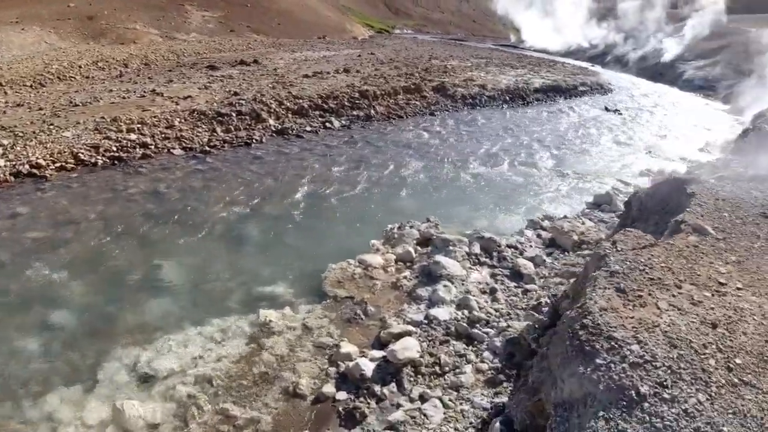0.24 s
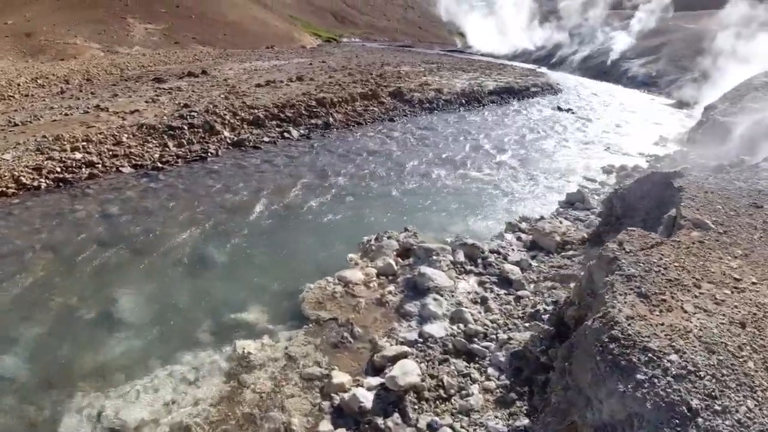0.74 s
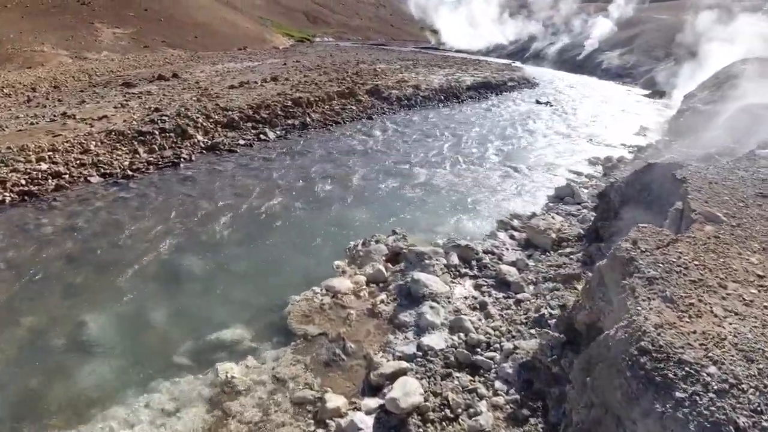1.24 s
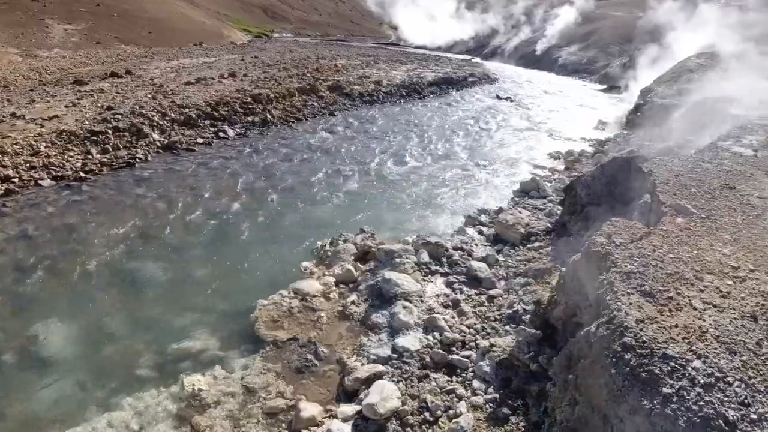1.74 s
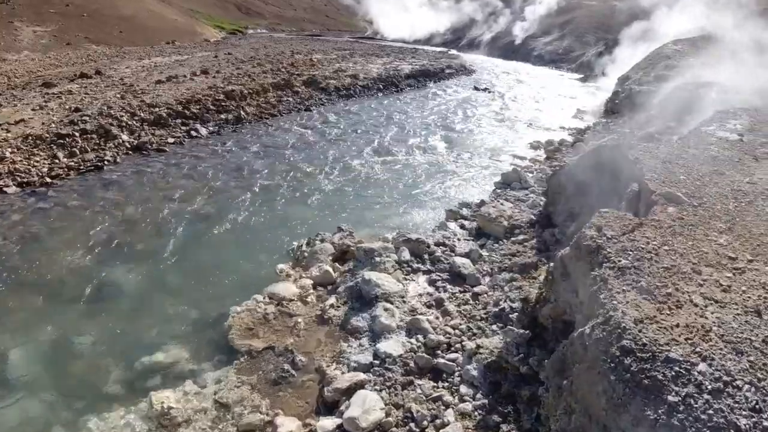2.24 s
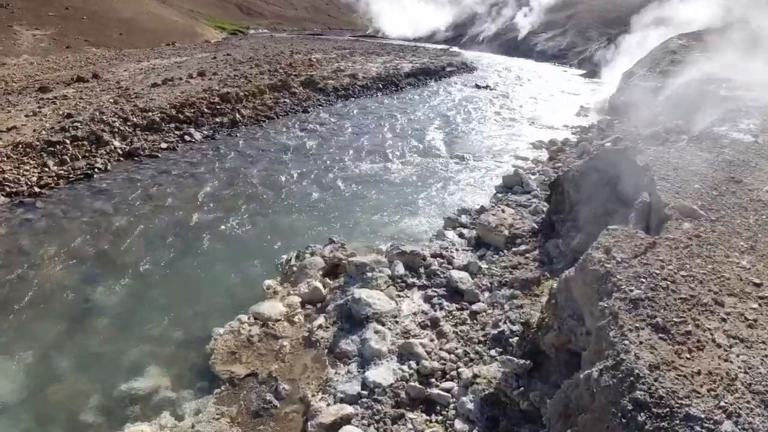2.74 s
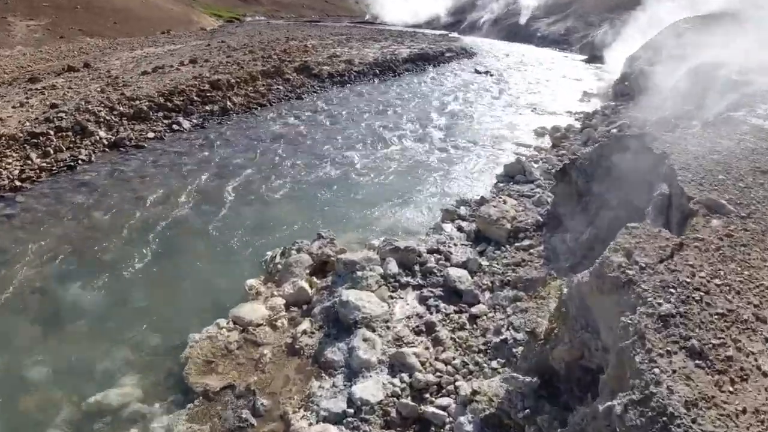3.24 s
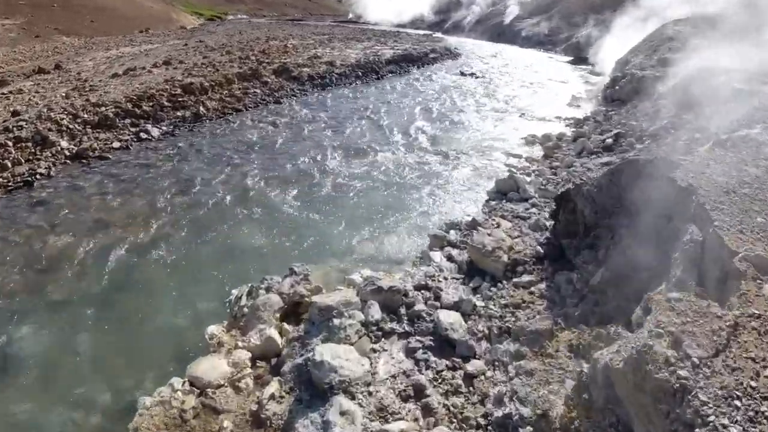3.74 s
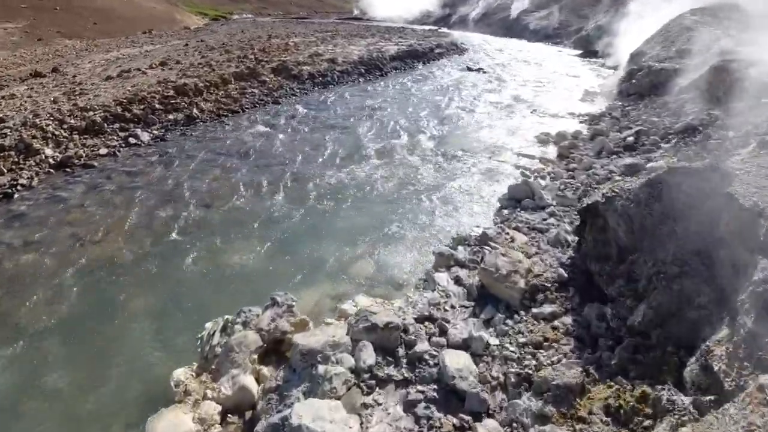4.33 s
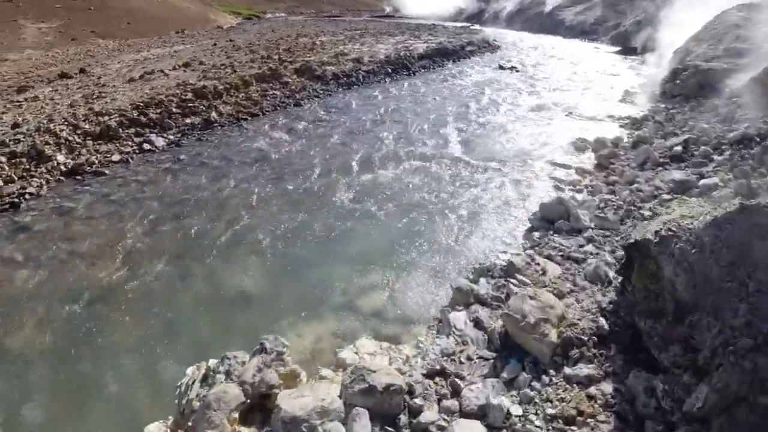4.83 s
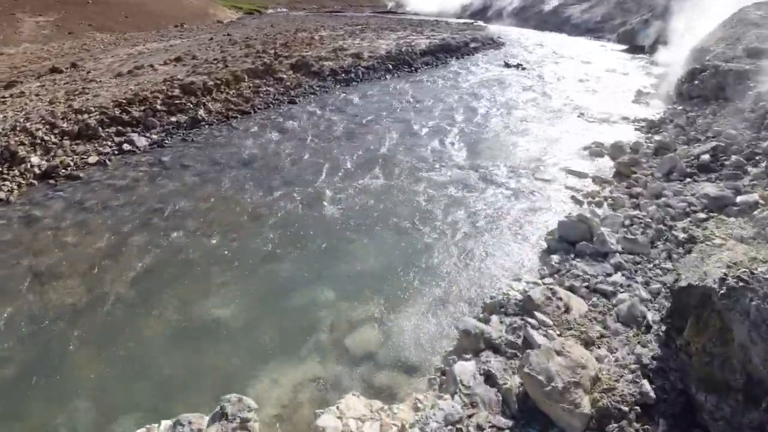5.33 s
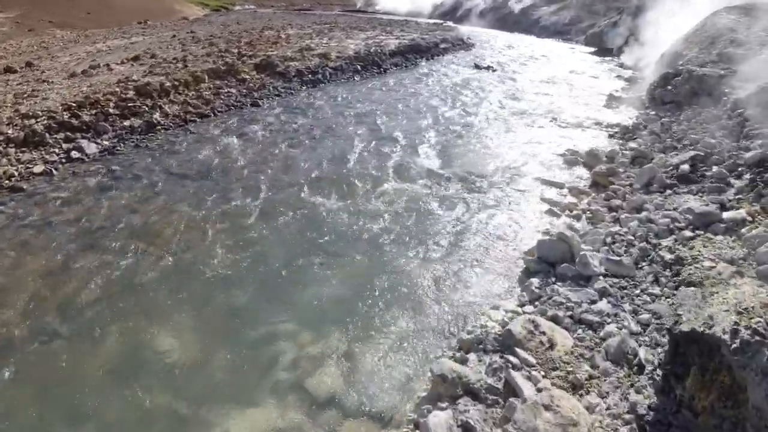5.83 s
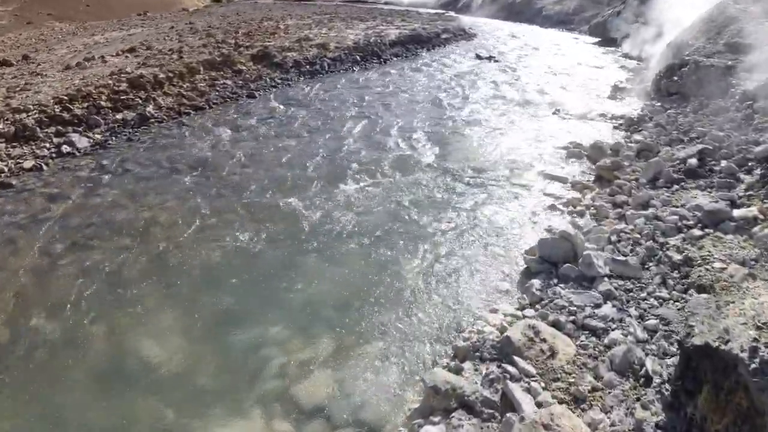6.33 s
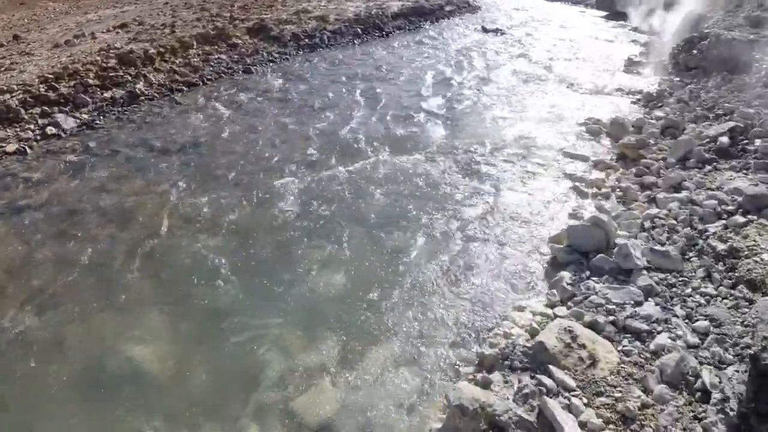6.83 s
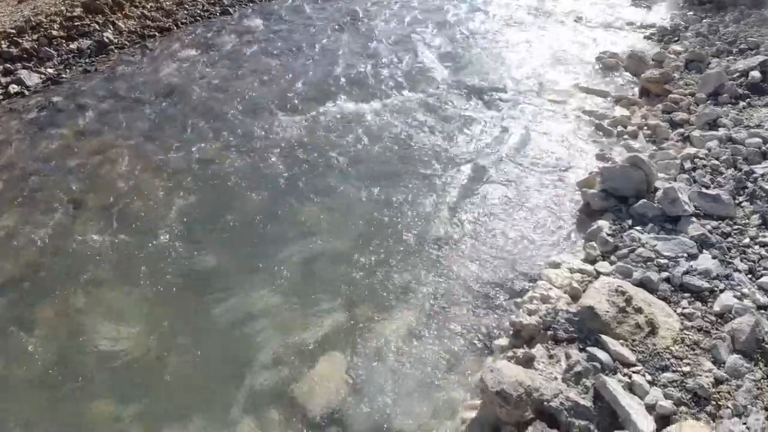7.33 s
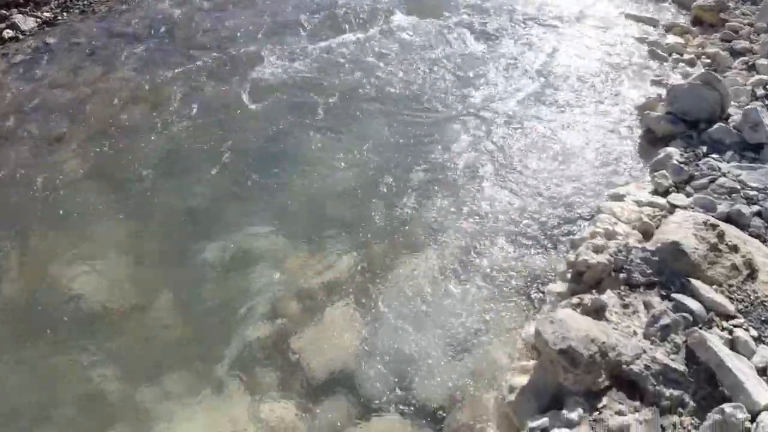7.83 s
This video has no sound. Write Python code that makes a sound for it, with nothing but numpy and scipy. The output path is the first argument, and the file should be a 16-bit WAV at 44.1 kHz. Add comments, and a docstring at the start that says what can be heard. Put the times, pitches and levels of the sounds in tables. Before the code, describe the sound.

Hot spring water boils with deep rounded glugs and plops among stones while a shallow stream babbles over gravel outdoors.

```python
"""Boiling vent beside a hot stream

Steam bubbles collapse under the stones: each swings the water, rings the hollow and shoves the ground.
Smaller bubbles glug and gargle over a low rumble; ringing bubbles and foam noise make the babbling riffle.
Single bubbles plink, water slaps, spray ticks and a pebble clicks; hissing steam and shaped noise lie behind.
A light breeze gusts early on and faintly later; a limiter ducks after the hardest peaks and recovers slowly."""
import sys
import numpy as np
from scipy import signal
from scipy.fft import rfft, irfft, next_fast_len
from scipy.io import wavfile
from scipy.ndimage import uniform_filter1d, minimum_filter1d, map_coordinates

SR = 44100
rng = np.random.default_rng(int(sys.argv[2]) if len(sys.argv) > 2 else 0)


def unload_audio(sound):
    """Save the sound as a 16-bit wav file, at the path given as the first command line argument."""
    columns = np.transpose(np.atleast_2d(sound))
    # keep every value between -1 and 1, then stretch to whole-number steps
    steps = np.round(np.clip(columns, -1, 1) * 32767)
    wavfile.write(sys.argv[1], SR, steps.astype(np.int16))


N = 355446
BLOW_S = .022  # span over which a blow's level is taken, in seconds


def amp(db):
    """Decibels to gain."""
    return 10 ** (np.asarray(db) / 20)


def unit(x):
    """Scale to rms 1."""
    return x / np.sqrt(np.mean(x ** 2) + 1e-20)


def blow(x):
    """Scale a short sound to the energy of rms 1 held for BLOW_S."""
    return x * np.sqrt(BLOW_S * SR / (np.sum(x ** 2) + 1e-20))


def fade(t, t60):
    """Exponential decay, 60 dB in t60."""
    return np.exp(-np.log(1000) * t / t60)


def along(points, hz):
    """Read a curve of (Hz, value) points on a log frequency axis."""
    f, v = np.transpose(points)
    return np.interp(np.log(hz + 1), np.log(f + 1), v)


def curves(rows):
    """One value per sample for each column after the time."""
    s, *cols = np.transpose(rows)
    return [np.interp(np.arange(N) / SR, s, c) for c in cols]


def wobble(rate):
    """A smooth random curve, rate knots a second."""
    knots = rng.standard_normal(int(N * rate / SR) + 4)
    return map_coordinates(knots, [np.arange(N) * rate / SR])


def add(track, s, sound):
    """Mix a sound into the track at time s."""
    part = track[max(round(s * SR), 0):][:len(sound)]
    part += sound[:len(part)]


def filtered(x, response):
    """Multiply the spectrum of x by a response of frequency."""
    m = next_fast_len(N + SR // 2)
    return irfft(rfft(x, m) * response(np.fft.rfftfreq(m, 1 / SR)), m)[..., :N]


def widen(pair, spectrum, wider_db=0):
    """Two signals become the coloured middle and sides of a stereo sound, near mono in the bass."""
    # Width of the sound. Each row: frequency in Hz, side minus mid in dB before wider_db and the cap.
    width_points = [(30, -29), (80, -38.5), (200, -28), (600, -27.5), (1100, -16), (2000, -12.5),
                    (2800, -8), (3600, 2), (4300, 2.5), (6000, -2.5), (8300, 2), (11000, -2)]
    # Part of the sides that is the middle turned a quarter cycle, so the left channel lags in the upper mids.
    # Each row: frequency in Hz, share from 0 to 1.
    lean_points = [(100, .15), (2500, .15), (3600, .38), (5500, .26), (9000, 0)]

    def blend(hz):
        lean = np.clip(along(lean_points, hz), 0, 1)
        return np.array([-1j * lean, np.sqrt(1 - lean ** 2)])

    def colour(hz):
        width = np.minimum(amp(along(width_points, hz) + wider_db), np.sqrt(2))
        return amp(along(spectrum, hz)) * np.array([np.ones_like(hz), width])

    across = filtered(pair, blend).sum(axis=0)
    mid, side = filtered(np.array([pair[0], across]), colour)
    return np.array([mid + side, mid - side])


def spread(pair, spectrum):
    """Coloured stereo of rms 1."""
    return unit(widen(pair, spectrum))


def patchy(pair, depth_db):
    """Eddies favour narrow pitch ranges for a moment at a time."""
    z = signal.stft(pair, nperseg=2048)[2]
    field = uniform_filter1d(rng.standard_normal(z.shape[1:]), size=3, axis=0)
    field = uniform_filter1d(field, size=3, axis=1)
    return unit(signal.istft(z * amp(depth_db * unit(field)), nperseg=2048)[1][:, :N])


def bubbles(rate, low_hz, high_hz, cycles, scatter_db, rise):
    """A swarm of rate ringing bubbles a second, of rms 1; each climbs in pitch as it nears the surface."""
    when, size, strength = rng.random((int(rate * N / SR), 3)).T
    hz = low_hz * (high_hz / low_hz) ** size
    t = np.arange(int(cycles / low_hz * SR)) / SR
    turns = hz[:, None] * t
    ring = np.sin(2 * np.pi * turns * (1 + rise * turns / cycles / 2))
    ring = ring * fade(turns, cycles) * (1 - np.exp(-2 * turns))
    rare = -np.log(1 - .99 * strength)  # mostly weak, now and then a strong one
    gain = amp(scatter_db * rare) * hz / low_hz  # small bubbles are brief but sharp
    index = (when * N).astype(int)[:, None] + np.arange(len(t))
    return unit(np.bincount(index.ravel(), (gain[:, None] * ring).ravel(), N)[:N])


def breeze(calm_db=-75, flutter_db=3.5):
    """A light wind comes in a few soft gusts and buffets each microphone port on its own."""
    # Gusts. Each row: centre in seconds, level in dB before the flutter, length in seconds.
    gusts = [(0.197, -49, 0.28), (0.794, -45.5, 0.41), (4.9, -58, 0.84), (7.1, -54.5, 0.5)]
    # Spectrum of the buffeting. Each row: frequency in Hz, relative level in dB.
    buffet_spectrum = [(12, -8.5), (30, 6.5), (60, -4.5), (110, -10), (200, -15), (500, -45), (1200, -90)]
    t = np.arange(N) / SR
    strength = amp(calm_db) + sum(amp(db) * np.exp(-((t - s) / length) ** 2) for s, db, length in gusts)
    noise = rng.standard_normal((2, N))
    buffet = unit(filtered(noise, lambda hz: amp(along(buffet_spectrum, hz))))
    return buffet * strength * amp(flutter_db * wobble(9.2))


def stream(babble_db=2.0, riffle_db=1.0, eddy_db=2.3):
    """Water folds air in over the gravel: larger bubbles babble, tiny ones fizz, and steam hisses far off."""
    # The current over the gravel.
    # Each row: time in seconds, babble in dB before babble_db, riffle in dB before riffle_db.
    flow = [(0.0, -54.5, -58.5), (0.72, -56, -62), (2.6, -57, -60.5), (2.9, -60, -61.5),
            (3.46, -55.5, -58.5), (4.4, -57.5, -60.5), (4.75, -56, -58.5), (5.25, -54.5, -59.5),
            (5.31, -57, -62), (6.2, -57.5, -62), (7.16, -54.5, -59.5), (7.74, -55.5, -62.5),
            (8.06, -54.5, -58.5)]
    # Hiss of the far steam. Each row: time in seconds, level in dB before the lapping.
    vapour = [(0, -79), (2.5, -80.5), (6.5, -80), (8.06, -76)]
    # Spectra of the three layers. Each row: frequency in Hz, relative level in dB.
    babble_spectrum = [(350, -27), (700, 6), (1000, 3.5), (1500, -1), (2000, -13.5), (3000, -24.5),
                       (6000, -64)]
    riffle_spectrum = [(900, -13.5), (1800, 0), (2500, -1), (2950, -3.5), (3500, -10), (4200, -17),
                       (5000, -19), (6000, -22.5), (7500, -35.5), (12000, -61.5)]
    steam_spectrum = [(3000, -20), (6000, -3), (8000, 0), (9400, -1), (11000, 1), (14000, -.5), (15700, -3)]
    babble_wash, riffle_wash = 2.1, 1.6  # foam noise over the bubbles, as gains

    babble_level, riffle_level = curves(flow)
    steam_level, = curves(vapour)
    large = np.array([bubbles(rate=450, low_hz=698.5, high_hz=2246, cycles=71, scatter_db=1.0, rise=0.025)
                      for _ in range(2)])
    tiny = np.array([bubbles(rate=1200, low_hz=1669, high_hz=5254, cycles=110, scatter_db=3.0, rise=0.024)
                     for _ in range(2)])
    large_foam = large + babble_wash * rng.standard_normal((2, N))
    tiny_foam = tiny + riffle_wash * rng.standard_normal((2, N))
    babble = spread(patchy(large_foam, depth_db=eddy_db), babble_spectrum)
    riffle = spread(patchy(tiny_foam, depth_db=eddy_db), riffle_spectrum)
    steam = spread(rng.standard_normal((2, N)), steam_spectrum)
    lapping = wobble(12)  # wavelets swell all three together
    return (babble * amp(babble_level + babble_db + .6 * lapping + 0.21 * wobble(7.5))
            + riffle * amp(riffle_level + riffle_db + .7 * lapping + 0.67 * wobble(18))
            + steam * amp(steam_level + .8 * lapping + .7 * wobble(28)))


def trickles():
    """Bubbles of nearly one size pinch off in a quick run and sing in a narrow band."""
    # A trickle singing through the gravel.
    # Each row: centre in seconds, level in dB, length in seconds, pitch in Hz, reach to either side in Hz.
    runs = [(1.835, -63, .025, 2850, 200), (2.89, -62, .04, 2780, 130), (3.17, -63.5, .09, 2960, 90),
            (3.42, -61, .09, 2940, 90), (3.22, -64, .12, 2250, 110), (3.41, -61, .08, 2480, 140),
            (5.07, -60, .2, 1340, 70), (5.05, -63, .17, 1930, 90), (5.19, -60.5, 0.055, 2790, 70),
            (6.95, -61, .09, 2550, 250), (7.2, -64, .14, 3250, 300)]
    out, t = np.zeros((2, N)), np.arange(N) / SR
    for s, db, length, hz, width_hz in runs:
        run = bubbles(rate=130, low_hz=hz - width_hz, high_hz=hz + width_hz,
                      cycles=70, scatter_db=3, rise=.015)
        out += amp(db) * np.exp(-((t - s) / length) ** 2) * run
    return out


def sprays():
    """Droplets patter on the stones: short, soft bursts of coloured noise."""
    # Fine spray at the bank. Each row: centre in seconds, level in dB, length in seconds.
    bursts = [(0.301, -66.5, 0.054), (0.318, -62, 0.003), (0.808, -66.5, 0.0087), (1.928, -71, .01),
              (2.159, -66.5, 0.007), (2.334, -62.5, 0.013), (2.443, -62, 0.004), (4.355, -65, 0.003),
              (4.526, -65, .005), (6.528, -66.5, 0.007), (7.254, -67, 0.012)]
    # Spectrum of the patter. Each row: frequency in Hz, relative level in dB.
    spray_spectrum = [(1500, -24.5), (3000, -9), (4500, 5), (5500, -2), (7000, -14.5), (10000, -17.5),
                      (15000, -34)]
    t = np.arange(N) / SR
    swell = sum(amp(db) * np.exp(-((t - s) / length) ** 2) for s, db, length in bursts)
    return swell * spread(rng.standard_normal((2, N)), spray_spectrum)


def wavelets(span=1.3):
    """A wavelet breaks on the stones into a swelling shower of fine droplets, each a short ring."""
    # Breaking wavelets. Each row: centre in seconds, level in dB, length in seconds, middle pitch in Hz.
    breaks = [(0.302, -49.5, 0.024, 1150), (3.455, -62, 0.14, 2180), (4.376, -62, 0.038, 2600),
              (6.928, -66.5, 0.042, 2330), (7.06, -59, 0.022, 2400), (7.146, -67, 0.044, 2860),
              (7.255, -53.5, 0.02, 1850), (6.9, -51, 0.05, 1100)]
    out, t = np.zeros(N), np.arange(N) / SR
    for s, db, length, hz in breaks:
        drops = bubbles(rate=800, low_hz=hz / span, high_hz=hz * span, cycles=13, scatter_db=3.5, rise=.05)
        out += amp(db) * np.exp(-((t - s) / length) ** 2) * drops
    return out


def pebble():
    """The current knocks a pebble against another, which rings briefly in three modes."""
    # Clicks. Each row: start in seconds, level in dB.
    clicks = [(2.626, -36.5)]
    # Modes of the pebble. Each row: frequency in Hz, relative level in dB, t60 in seconds.
    modes = [(2450, 0, .02), (4880, -17, .017), (6330, -23, .018)]
    out, t = np.zeros(N), np.arange(SR // 20) / SR
    ring = sum(amp(level) * np.sin(2 * np.pi * hz * t) * fade(t, t60) for hz, level, t60 in modes)
    for s, db in clicks:
        add(out, s, amp(db) * ring * (1 - np.exp(-t / .0006)))
    return out


def ticks():
    """Spray hits something small and hard: a thin snap and a high ring, then a faint bounce."""
    # Hits. Each row: start in seconds, snap in dB, ring in dB.
    hits = [(1.603, -48, -63.5), (1.614, -66, -73)]
    # Modes of what the spray hits. Each row: frequency in Hz, relative level in dB, t60 in seconds.
    modes = [(6550, -7, .03), (6700, -3, .08), (6950, 4, .014), (7070, 0, .055), (7380, -4, .04),
             (8480, -7, .08), (8830, -11, .08)]
    out, t = np.zeros(N), np.arange(SR // 6) / SR
    band = signal.butter(2, [1000, 3600], "band", fs=SR, output="sos")
    for s, snap_db, ring_db in hits:
        ring = sum(amp(level) * np.sin(2 * np.pi * hz * t) * fade(t, t60) for hz, level, t60 in modes)
        snap = unit(signal.sosfilt(band, rng.standard_normal(len(t)))) * fade(t, .008)
        add(out, s, amp(ring_db) * ring + amp(snap_db) * snap)
    return out


def slaps(t60=0.016, span=1.39, level_db=-12):
    """Thrown water lands on the stones with a short, dull smack of band-limited noise."""
    # Smacks. Each row: start in seconds, level in dB before level_db, middle pitch in Hz.
    smacks = [(2.438, -42, 1350), (2.543, -38.5, 850), (5.759, -42.5, 1005), (6.098, -29.5, 1070),
              (5.911, -40.5, 1000), (7.066, -33.5, 900), (7.168, -38.5, 865), (7.236, -31.5, 800),
              (7.642, -34.5, 900), (7.745, -41.5, 1200), (7.842, -42, 1050), (7.976, -42, 940)]
    out, t = np.zeros(N), np.arange(SR // 20) / SR
    for s, db, hz in smacks:
        band = signal.butter(4, [hz / span, hz * span], "band", fs=SR, output="sos")
        smack = signal.sosfilt(band, rng.standard_normal(len(t)) * fade(t, t60))
        add(out, s, amp(db + level_db) * blow(smack))
    return out


def plinks(rise=0.025, shed_s=0.019, pitch_scatter=0.16, satellite_db=-18, count=2):
    """A bubble bursting at the surface rings briefly, rising, and sheds weaker ones of other sizes."""
    # The nearest bubbles. Each row: start in seconds, level in dB, pitch in Hz, t60 in cycles.
    bursts = [(.012, -26, 594, 24), (.141, -42, 2890, 45), (.171, -26, 570, 14), (.202, -27, 594, 30),
              (.791, -29, 1206, 28), (.808, -31.5, 1220, 31), (.848, -22, 570, 17), (.968, -30.5, 521, 62),
              (1.535, -24, 728, 16), (2.429, -36.5, 2950, 26), (2.431, -36, 2584, 26),
              (2.439, -19, 1270, 14.5), (2.44, -45, 4190, 18), (2.544, -19.5, 670, 20),
              (2.572, -42, 3800, 14), (2.726, -36, 1280, 44), (2.828, -45, 3320, 47),
              (2.879, -40.5, 2260, 50), (2.975, -32, 1550, 30), (2.976, -34, 2270, 32),
              (2.976, -50, 2960, 150), (3.35, -42, 2412, 100), (3.371, -44, 2950, 83),
              (3.502, -41.5, 1410, 30), (3.661, -25, 604, 21), (4.133, -25, 583, 40),
              (4.354, -52, 5110, 36), (4.438, -20.5, 658, 15.5), (4.734, -24, 606, 19),
              (5.069, -37.5, 1378, 36), (5.136, -45, 2780, 77), (5.275, -27, 674, 28), (5.38, -33, 807, 30),
              (5.76, -33, 1124, 34), (5.774, -23, 550, 31), (5.818, -24.5, 697, 10), (6.056, -26, 690, 26),
              (6.072, -23.5, 727, 25), (6.523, -36.5, 2060, 46), (6.553, -36, 1750, 23),
              (6.577, -40.5, 1580, 64), (6.893, -44.5, 2500, 60), (6.921, -46, 2800, 70),
              (6.964, -42, 2412, 50), (7.031, -35.5, 2500, 24), (7.218, -20.5, 467, 24),
              (7.331, -46.5, 3380, 150), (7.345, -23.5, 464, 28), (7.452, -33.5, 1486, 35),
              (7.595, -38.5, 1600, 72), (7.642, -25.5, 1580, 18), (7.642, -17, 430, 12),
              (7.649, -27.5, 980, 30), (7.836, -19, 574, 15), (7.978, -28, 583, 20), (7.982, -25, 919, 20)]
    out, t = np.zeros(N), np.arange(SR // 12) / SR

    def ring(hz, cycles):
        turns = hz * t
        tone = np.sin(2 * np.pi * turns * (1 + rise * turns / cycles / 2))
        return tone * fade(t, cycles / hz) * (1 - np.exp(-(turns / 2) ** 2))

    for s, db, hz, cycles in bursts:
        add(out, s, amp(db) * ring(hz, cycles))
        for late, size in zip(rng.random(count), rng.standard_normal(count)):
            satellite = ring(hz * np.exp(pitch_scatter * size), cycles)
            add(out, s + shed_s * late, amp(db + satellite_db) * satellite)
    return out


def boil(rumble_db=4.5, simmer_db=0.2, deep_db=1, bright_db=2.5):
    """Countless smaller steam bubbles glug and gargle in the vent over the rumble of the ground."""
    # How hard the vent boils. Each row: time in seconds, then simmer, deep gargle, bright gargle
    # and rumble, all in dB before the trims above.
    vigour = [(0.0, -42, -52, -50.5, -39.5), (0.401, -41.5, -46.5, -52, -48), (0.9, -41, -47, -47, -41.5),
              (1.28, -41.5, -50, -55, -50.5), (1.91, -42, -48, -51.5, -45),
              (2.531, -44.5, -49, -51.5, -44.5), (3.16, -40.5, -60.5, -53.5, -48.5),
              (3.75, -38.5, -50, -50, -43.5), (4.51, -40, -54.5, -52, -43.5),
              (5.25, -35.5, -54, -46.5, -38), (5.55, -44.5, -58, -53, -44.5),
              (6.02, -42.5, -45, -51.5, -43.5), (6.31, -41, -48.5, -58, -43.5),
              (6.84, -42.5, -46.5, -54.5, -43), (7.65, -38, -39.5, -51.5, -39),
              (8.06, -36.5, -45, -49.5, -45)]
    # Spectra of the four layers. Each row: frequency in Hz, relative level in dB.
    rumble_spectrum = [(12, -22), (25, -8), (50, -3.5), (75, -4), (115, -7.5), (170, -6.5), (300, -27),
                       (600, -74)]
    simmer_spectrum = [(70, -18), (140, -7), (205, 2), (245, 0.5), (300, -4), (380, -23.5), (600, -34.5),
                       (1500, -80.5)]
    deep_spectrum = [(200, -21), (320, 4.5), (390, -3.5), (470, -1), (540, -7.5), (650, -28), (1500, -68.5)]
    bright_spectrum = [(350, -26), (500, -0.5), (590, 1.5), (700, 2), (760, -11.5), (830, -22.5),
                       (1100, -31), (2500, -70)]
    simmer_churn, gargle_churn = 1.9, 3.6  # foam noise over the bubbles, as gains
    gargle_surge_db = 1.9

    def churned(swarm, churn):
        middle = unit(swarm + churn * rng.standard_normal(N))
        return unit(np.array([middle, rng.standard_normal(N)]))

    simmer_level, deep_level, bright_level, rumble_level = curves(vigour)
    surge = wobble(13)  # shared by all layers
    rumble = spread(rng.standard_normal((2, N)), rumble_spectrum) * unit(amp(0.79 * surge + 2.1 * wobble(13)))
    glugs = bubbles(rate=70, low_hz=132.3, high_hz=350.0, cycles=10, scatter_db=3.5, rise=0.053)
    simmer = spread(churned(glugs, simmer_churn), simmer_spectrum) * unit(amp(0.5 * surge))
    out = amp(rumble_level + rumble_db) * rumble + amp(simmer_level + simmer_db) * simmer
    # two gaps between the stones, a wide and a narrow one, each with its own resonance
    gaps = (deep_level + deep_db, deep_spectrum), (bright_level + bright_db, bright_spectrum)
    for level, spectrum in gaps:
        swarm = bubbles(rate=150, low_hz=322.3, high_hz=638.3, cycles=26, scatter_db=1.5, rise=0.055)
        gargle = spread(patchy(churned(swarm, gargle_churn), depth_db=1.0), spectrum)
        out += amp(level) * gargle * unit(amp(gargle_surge_db * surge))
    return out


def shove(t, push_hz=70, push_t60=0.038, swell=0.0044, scatter=0.26):
    """One low, quickly damped push of the ground, its pitch scattered at random around push_hz."""
    hz = push_hz * np.exp(scatter * rng.standard_normal())
    return blow(-np.sin(2 * np.pi * hz * t) * fade(t, push_t60) * (1 - np.exp(-t / swell)))


def heaves():
    """Steam pockets far below the stones are heard only as a push of the ground."""
    # Deep pockets. Each row: start in seconds, level in dB.
    pockets = [(1.079, -31), (2.004, -31), (2.889, -32.5), (3.957, -33.5), (4.159, -36), (4.529, -29),
               (4.926, -32), (5.373, -33.5), (6.048, -35.5), (7.484, -32), (7.218, -30.5), (7.924, -33),
               (7.965, -30)]
    out, t = np.zeros(N), np.arange(SR // 6) / SR
    for s, db in pockets:
        add(out, s, amp(db) * shove(t))
    return out


def thumps(swell_cycles=1.51, sag=0.24, wander=0.032, focus=3, snap_s=0.0021):
    """Each collapse swings the water, rising as the bubble shrinks, rings the hollow and shoves the ground."""
    # The big steam bubbles collapsing in the vent. Each row: start in seconds, thump pitch in Hz,
    # thump level in dB, thump t60 in seconds, gurgle level in dB, gurgle pitch in Hz.
    collapses = [(0.1656, 174, -32, 0.071, -33, 434), (0.2688, 245, -35, 0.06, -38, 490),
                 (0.379, 233, -38.5, 0.037, -43, 450), (0.414, 240, -28.5, 0.0098, -28, 440),
                 (0.6028, 252, -30.5, 0.029, -37, 447), (0.7493, 198.5, -28.5, 0.071, -37, 399),
                 (0.8457, 228, -27.5, 0.02, -30.0, 446), (1.0773, 181, -28.5, 0.045, -42.5, 470),
                 (1.1056, 229, -32, 0.068, -48.5, 436), (1.235, 226, -25.0, 0.04, -41.5, 470),
                 (1.485, 217, -35.5, 0.039, -45.5, 462), (1.5265, 220, -24, 0.056, -29, 442),
                 (1.7729, 206.5, -23, 0.06, -37.5, 477), (1.9981, 211.5, -25, 0.022, -41, 467),
                 (2.14, 203, -35, .04, -51.5, 470), (2.1787, 216, -28, 0.055, -47, 473),
                 (2.4702, 216, -23, 0.03, -44.5, 462), (2.54, 220, -31, 0.026, -34, 514),
                 (2.626, 247, -37.5, 0.049, -42.5, 423), (2.782, 222.5, -19.5, 0.05, -40.5, 450),
                 (2.8115, 226, -34.5, 0.02, -42, 580), (2.8633, 224, -32, 0.033, -51.5, 409),
                 (2.8916, 194, -35, 0.072, -38.5, 504), (3.109, 208, -34.5, .04, -56, 480),
                 (3.219, 214, -33, 0.048, -56, 480), (3.4275, 185, -33, 0.05, -52, 460),
                 (3.475, 203, -32.5, .035, -51, 480), (3.5373, 202.3, -22.5, 0.03, -50.5, 514),
                 (3.6458, 203, -34, 0.029, -44.5, 590), (3.7865, 214, -24, 0.035, -39.5, 506),
                 (3.896, 220, -34, .04, -44, 470), (3.953, 209, -34.5, 0.038, -49, 473),
                 (3.995, 221, -31, 0.025, -52, 482), (4.1553, 193.5, -23.5, 0.051, -34.5, 503),
                 (4.201, 182, -31.5, 0.052, -54, 550), (4.253, 200, -25, 0.031, -53.5, 450),
                 (4.383, 238, -31, 0.068, -59, 485), (4.4301, 174, -27, 0.036, -36.5, 447),
                 (4.4624, 181, -28.5, 0.045, -52, 520), (4.533, 241, -29, 0.043, -45.5, 420),
                 (4.6362, 117.7, -29.5, 0.056, -42, 447), (4.651, 202.5, -37, .035, -48, 470),
                 (4.7872, 259.5, -26.5, 0.033, -38, 503), (4.9249, 205, -24.5, 0.023, -39.5, 393),
                 (5.001, 207, -31.5, 0.032, -49.5, 480), (5.0335, 218, -31.5, 0.041, -57, 546),
                 (5.1109, 201, -27, 0.043, -48, 505), (5.127, 197.3, -28.5, 0.036, -45, 480),
                 (5.2412, 185.6, -27, 0.097, -37.5, 506), (5.293, 205.6, -21, 0.037, -36.5, 450),
                 (5.3214, 221, -29, 0.013, -49.5, 409), (5.3735, 242, -30, 0.026, -38, 490),
                 (5.5308, 190.4, -32, 0.046, -53.5, 478), (5.7193, 196.5, -22.5, 0.033, -42, 457),
                 (5.7493, 113, -24, 0.014, -31.5, 442), (5.815, 209.6, -18, 0.055, -28, 472),
                 (5.8471, 230, -33, 0.04, -45, 450), (5.912, 230, -32.5, 0.053, -40.5, 456),
                 (6.0049, 214.4, -20, 0.046, -27, 427), (6.0478, 133, -30.5, 0.015, -35, 487),
                 (6.095, 173, -25.5, 0.039, -28.5, 435), (6.158, 189, -31, 0.033, -49, 450),
                 (6.5103, 197, -23.5, 0.023, -35, 437), (6.6045, 198, -30.5, 0.067, -50.5, 412),
                 (6.945, 236, -35.5, .04, -49, 450), (7.025, 207.6, -28, 0.055, -48, 465),
                 (7.1124, 228, -30, 0.018, -48, 420), (7.1531, 257, -32.5, 0.032, -37, 390),
                 (7.292, 217.3, -25.5, 0.073, -37, 379), (7.3242, 346, -26.5, 0.02, -42, 420),
                 (7.3945, 342, -24, 0.016, -35, 392), (7.4828, 210, -22.5, 0.044, -30, 395),
                 (7.6208, 205.5, -26.5, 0.033, -35, 388), (7.662, 224.5, -27, 0.065, -36, 452),
                 (7.7564, 197.4, -22.5, 0.046, -37.5, 395), (7.8312, 213, -20, 0.085, -26, 459),
                 (7.8929, 340, -27.5, 0.035, -38.5, 370), (7.919, 190, -32.5, 0.038, -43, 440),
                 (7.9651, 116.3, -31.5, 0.014, -25.5, 393), (8.017, 221, -27.5, 0.04, -47.5, 387)]
    # Modes of the hollow between the stones.
    # Each row: frequency in Hz, relative level in dB, t60 in seconds; detuned and scattered below.
    hollow_modes = [(333, 2.5, 0.054), (396, 4, 0.038), (468.5, 1, 0.045), (576, 0, 0.06), (686, -3, 0.057)]
    push_db = -16.5  # the shove of the ground, relative to the thump
    snap_cycles = 0.904  # the hollow rings when the bubble snaps shut, this many swings after the start
    hollow_top_hz = 824  # the stones muffle the hollow above this

    out, t = np.zeros(N), np.arange(SR // 6) / SR
    mode_hz, mode_db, mode_t60 = np.transpose(hollow_modes)[:, :, None]
    muffle = signal.butter(6, hollow_top_hz, fs=SR, output="sos")
    for s, hz, body_db, t60, gurgle_db, gurgle_hz in collapses:
        detune, strength = rng.standard_normal((2, len(hollow_modes), 1))
        turns = hz * t
        swing = np.sin(2 * np.pi * (sag * (1 - np.exp(-turns)) - turns))
        swing = swing * (1 - np.exp(-(turns / swell_cycles) ** 2)) * fade(t, t60)
        # the bubble's size picks the modes that answer most; the water level detunes them
        reach = 1 / (1 + (focus * np.log2(mode_hz / gurgle_hz)) ** 2)
        tones = np.sin(2 * np.pi * mode_hz * (1 + wander * detune) * t) * fade(t, mode_t60)
        modes = reach * amp(mode_db + 3.5 * strength) * tones
        hollow = signal.sosfilt(muffle, modes.sum(axis=0) * (1 - np.exp(-t / snap_s)))
        add(out, s, amp(body_db) * (blow(swing) + amp(push_db) * shove(t)))
        add(out, s + snap_cycles / hz, amp(gurgle_db) * blow(hollow))
    return out


def bank(x):
    """The stones scatter each sound into a short tail that changes as the water moves."""
    # Scatter among the stones. Each row: frequency in Hz, t60 in seconds.
    scatter = [(150, .16), (600, 0.2), (3000, 0.056), (10000, 0.011)]
    out, t = np.zeros((2, N)), np.arange(N) / SR
    paths, gap_s = 5, 0.0087  # gap: silence before each tail
    for k in range(paths):
        hz, s, z = signal.stft(rng.standard_normal((2, SR // 4)), SR, nperseg=256)
        tail = signal.istft(z * fade(s, along(scatter, hz)[:, None]), SR, nperseg=256)[1]
        tail = np.pad(tail / np.linalg.norm(tail[0]), ((0, 0), (round(gap_s * SR), 0)))
        # the paths crossfade in turn, four a second
        share = np.clip(1 - np.abs((t * 4 - k) % paths - 1), 0, 1)
        out += signal.fftconvolve((x * share)[None], tail, axes=1)[:, :N]
    return widen(out, [(100, 0.0031), (10000, 0.0041)], wider_db=10.0)  # practically flat colour


def aside(x, lag_s):
    """A source on the right reaches the left microphone a little later."""
    return filtered(x, lambda hz: np.exp(1j * np.pi * hz * lag_s * np.array([[-1], [1]])))


def limited(x, ceiling=.29, release_s=0.53):
    """Peaks over the ceiling push the gain down at once; it recovers slowly."""
    t = np.arange(N) / SR
    excess = np.log(np.maximum(np.abs(x).max(axis=0) / ceiling, 1))
    held = np.maximum.accumulate(excess * np.exp(t / release_s)) * np.exp(-t / release_s)
    gain = uniform_filter1d(minimum_filter1d(np.exp(-held), size=64), size=64)
    return x * gain


def scene(vent_wet_db=-14, surface_wet_db=-14):
    """The vent lies a little to the right, the stream all around it."""
    vent = thumps() + heaves()
    surface = plinks() + slaps() + ticks() + pebble() + wavelets()
    echo = bank(amp(vent_wet_db) * vent + amp(surface_wet_db) * surface)
    vent_side = aside(vent + boil(), lag_s=.000035)
    return vent_side + surface + echo + sprays() + trickles() + stream() + breeze()


def record(dry, top_hz=15700):
    """Limit the peaks and keep nothing from top_hz upward."""
    return filtered(limited(dry), lambda hz: hz < top_hz)


dry = scene()
out = record(dry)
unload_audio(out)
```